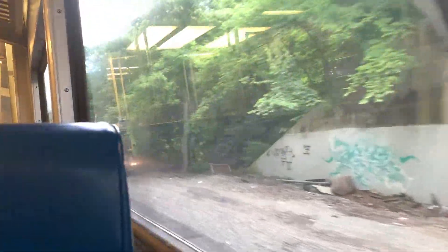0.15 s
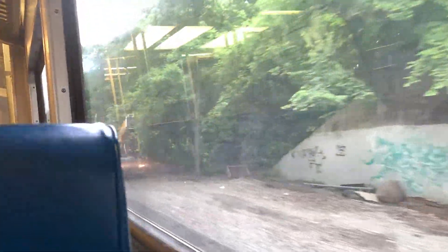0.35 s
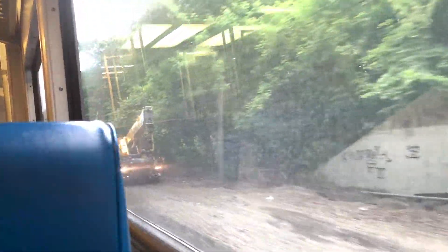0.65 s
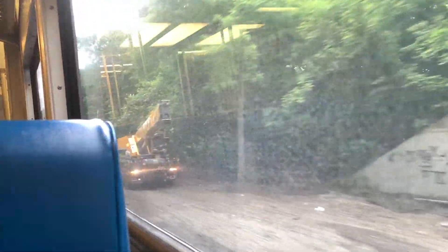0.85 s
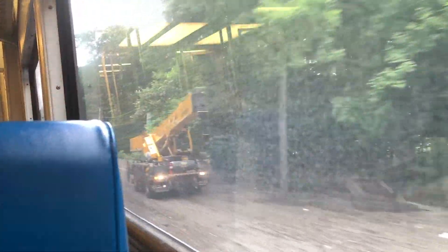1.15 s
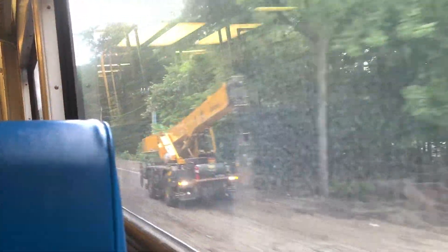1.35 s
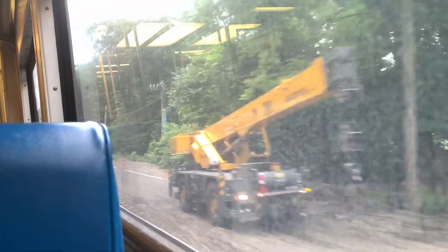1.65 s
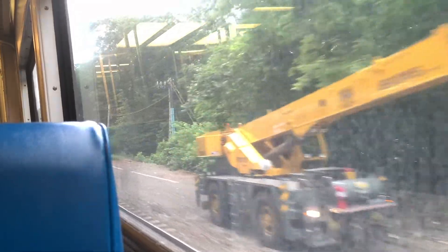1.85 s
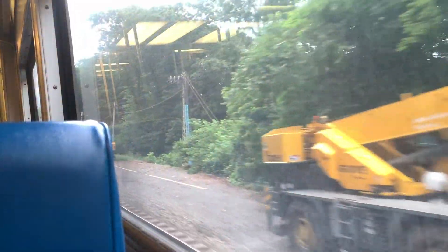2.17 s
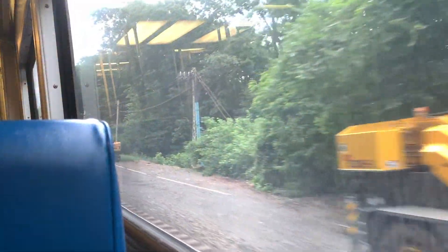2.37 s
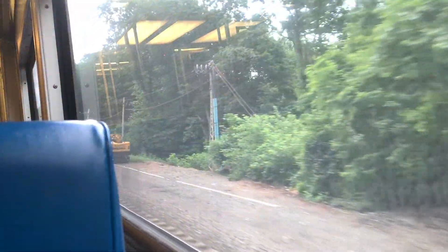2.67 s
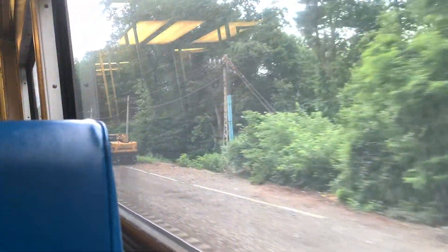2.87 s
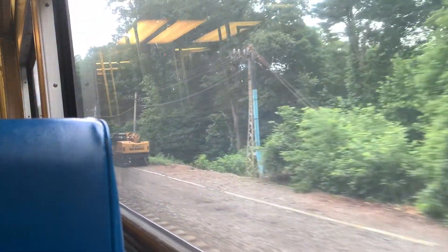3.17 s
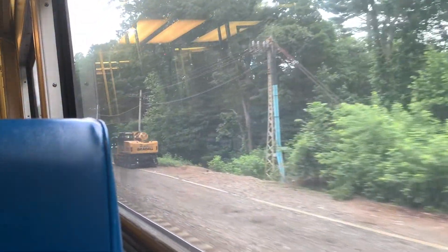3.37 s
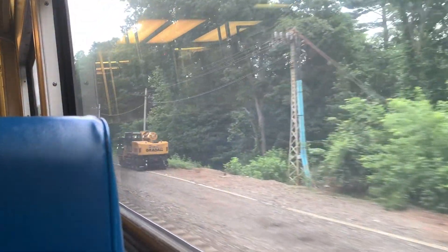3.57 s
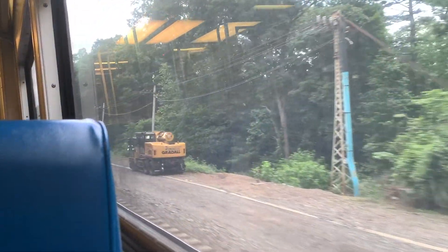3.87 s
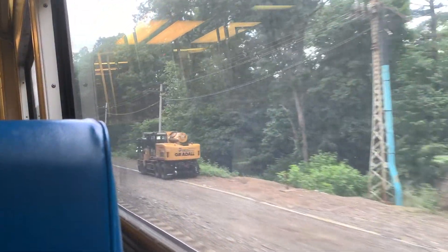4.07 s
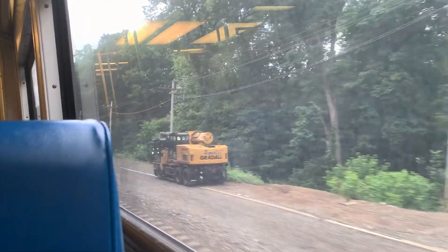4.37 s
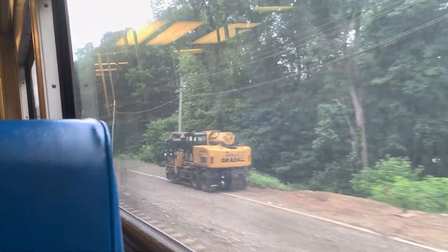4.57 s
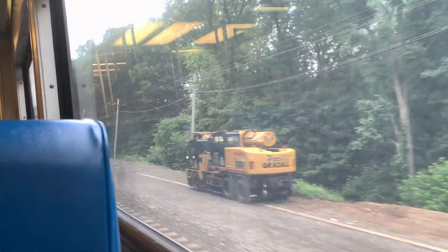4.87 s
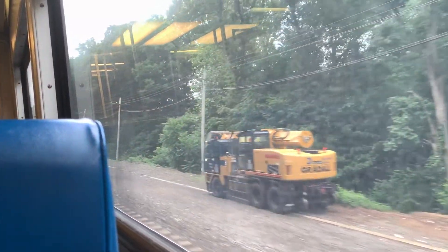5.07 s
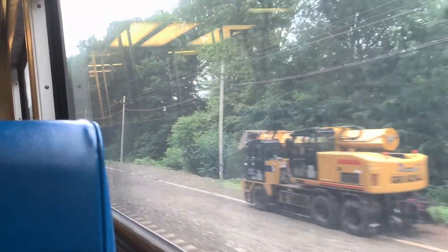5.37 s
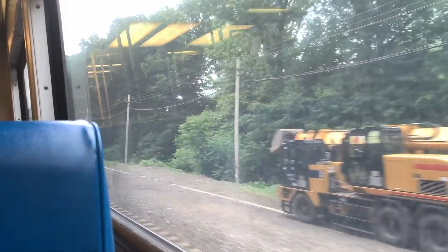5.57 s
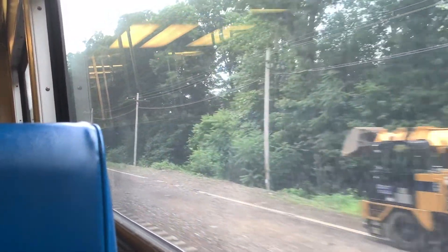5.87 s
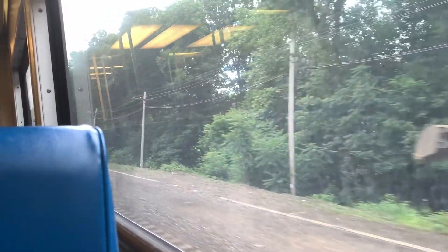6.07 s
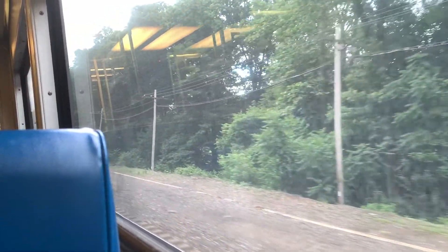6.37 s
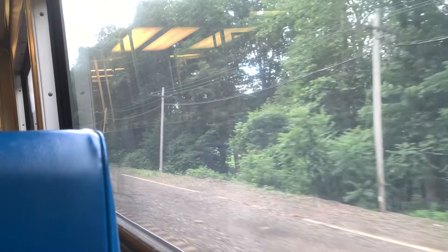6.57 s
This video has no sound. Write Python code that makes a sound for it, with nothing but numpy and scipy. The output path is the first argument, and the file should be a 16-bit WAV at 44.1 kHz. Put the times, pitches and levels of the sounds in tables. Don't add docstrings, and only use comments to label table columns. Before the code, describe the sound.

Inside a moving electric train car, a low, bumpy rumble and muffled roar run throughout. Two close fan hums beat slowly beneath soft duct air and a faint high electrical whine. Small dry clicks and faint creaks occur irregularly; after the middle, a loose panel buzzes with quick light knocks. Close stereo microphones sit in the cabin. Vehicles passing outside make no distinct sound.

```python
import sys
import numpy as np
from scipy import signal
from scipy.fft import rfft, irfft, next_fast_len
from scipy.io import wavfile
from scipy.ndimage import uniform_filter1d

SR = 44100
rng = np.random.default_rng(int(sys.argv[2]) if len(sys.argv) > 2 else 0)


def inscribe(sig):
    pcm = np.round(np.clip(np.atleast_2d(sig).T, -1, 1) * 32767)
    wavfile.write(sys.argv[1], SR, pcm.astype(np.int16))


def nominal_scale(level):
    x = np.asarray(level, float) / 20
    return 10 ** x


N = 296793

SIDE = np.array([[.5], [-.5]])
PANEL_SHAFT_HZ = 34.78

# t/s, f/Hz, rms level/dB
NEAR_FAN = [(0.0, 117.78, -33.5), (0.48, 117.81, -35), (0.96, 118.0, -34.2), (1.44, 118.08, -31.7),
            (1.92, 118.12, -31.5), (2.4, 118.05, -30.5), (2.88, 118.18, -31.5), (3.36, 118.4, -31.6),
            (3.84, 118.44, -32.3), (4.32, 118.6, -34.1), (4.8, 118.76, -32.9), (5.28, 118.55, -30.0),
            (5.76, 118.35, -31.2), (6.24, 118.35, -30.4), (6.73, 118.34, -33.4)]
# t/s, level/dB
AIR = [(0, 0), (.25, 0.5), (.75, 0), (1.25, -1), (2.1, -1), (2.7, -1), (3.6, 0), (4.2, -1), (4.9, 0.5),
       (5.3, -.5), (6.1, 0), (6.73, -0.5)]


def evened(x):
    return x / np.sqrt(np.mean(abs(x) ** 2) + 1e-20)


def read(points, hz, col=1):
    table = np.transpose(points)
    return np.interp(np.log(hz + 1), np.log(table[0] + 1), table[col])


def curve(rows, col):
    table = np.transpose(rows)
    return np.interp(np.arange(N) / SR, table[0], table[col])


def bells(rows, half_s):
    s, value = np.transpose(rows)
    distance = (np.arange(N) / SR - s[:, None]) / half_s
    return np.exp(-.5 * distance ** 2), value[:, None]


def add(mix, s, sound):
    part = mix[:, round(s * SR):][:, :sound.shape[1]]
    part += sound[:, :part.shape[1]]


def slow(per_s):
    t = np.arange(0, N + 64, 64) / SR
    waves = [np.sin(2 * np.pi * (f * t + rng.random())) for f in per_s * np.geomspace(.1, 1, num=16)]
    return np.repeat(evened(sum(waves)), 64)[:N]


def noise(shape, peaks, patchy_db, size):
    # f/Hz, coherence 0-1, phase lead of the left/rad
    stereo_likeness = [(45, .995, 0), (67, .97, -.05), (80, .96, -.21), (108, .95, -.25), (128, .95, -.05),
                          (200, .94, 0), (330, .7, .6), (480, .45, .9), (950, .2, 1.5), (1750, .4, 3.2),
                          (2000, .35, 6.3), (2400, .05, 6.3), (4200, .15, 6.3), (5400, .25, 9.4),
                          (8700, .4, 9.4), (10100, .7, 6.3), (11300, .6, 3.3), (12200, .9, 3.1), (12900, .9, 0),
                       (14400, .9, 0), (15000, .9, -3.1)]
    # f/Hz, level/dB
    port_lean = [(60, -0.5), (99, -1.5), (160, -2), (270, -2.5), (450, -0.5), (740, -0.5), (1220, 0),
                 (2010, 0.0), (3330, 2), (5500, 0.5), (9080, -4.5), (15000, 6.5)]
    ports = stereo_likeness
    hop, hz = size // 4, np.fft.rfftfreq(size, 1 / SR)
    a, b, c, d, patches = rng.standard_normal((N // hop + 6, len(hz), 5)).T
    patches = uniform_filter1d(patches, size=size // 100, axis=0)
    patches = evened(uniform_filter1d(patches, size=3, axis=1))
    boost = 1 + sum(nominal_scale(db) ** 2 / (1 + (2 * (hz - f) / w) ** 4) for f, w, db in peaks)
    gain = nominal_scale(read(shape, hz)) * np.sqrt(boost)
    same = np.clip(read(ports, hz), 0, 1)[:, None]
    delay = np.exp(-1j * read(ports, hz, col=2))[:, None]
    left = a + 1j * b
    right = same * left * delay + np.sqrt(1 - same ** 2) * (c + 1j * d)
    lean = nominal_scale(read(port_lean, hz) / 2)[:, None]
    z = np.array([left * lean, right / lean]) * gain[:, None] * nominal_scale(patchy_db * patches)
    return evened(signal.istft(z, nperseg=size, noverlap=size - hop)[1][:, :N])


def steadied(x, share):
    power = uniform_filter1d((x ** 2).mean(0), size=3500)
    return evened(x / (power + 0.058 * power.mean()) ** (share / 2))


def tone(turns, db, lean_db, lead):
    return np.sqrt(2) * nominal_scale(db + lean_db * SIDE) * np.cos(2 * np.pi * turns + lead * SIDE)


def rumble():
    # f/Hz, level/dB per Hz
    rumble_spectrum = [(15, -38), (24, -32), (30, -0.5), (38, -20), (43, -13.5), (49, -3.5), (57, -1),
                       (70, -5), (90, -2.5), (104, -6.5), (110, -12), (130, -30), (200, -86)]
    # f/Hz, width/Hz, level over the rumble/dB
    floor_modes = [(42.3, 2, 2), (75.2, 1.6, -3.5), (87, 4.9, -15)]
    # t/s at the crest, rms level of the floor/dB
    bumps = [(.13, -23.5), (.32, -28.5), (.62, -27.5), (.78, -30), (1.03, -28.5), (1.22, -24), (1.47, -29),
             (1.68, -26), (1.85, -31.5), (2.0, -29), (2.2, -26.5), (2.38, -25.5), (2.75, -28), (2.95, -30),
             (3.2, -30), (3.4, -29.5), (3.62, -26.5), (3.85, -24), (4.05, -26.5), (4.27, -26),
             (4.52, -29.5), (4.78, -28.5), (5.1, -25.5), (5.3, -29.5), (5.55, -29), (5.77, -27.5),
             (5.92, -29), (6.12, -32.5), (6.48, -24), (6.67, -28)]
    bell, db = bells(bumps, half_s=0.042)
    smooth_rail_db = -31
    surge = np.sqrt(nominal_scale(smooth_rail_db) ** 2 + (nominal_scale(db) ** 2 * bell).sum(0))
    return surge * steadied(noise(rumble_spectrum, floor_modes, patchy_db=.4, size=16384), share=.92)


def roar():
    # f/Hz, level/dB per Hz
    roar_spectrum = [(70, -48), (104, 5.5), (110, -14), (124, -15.5), (130, -5.5), (140, 3), (160, -4.5),
                     (170, -5), (210, -8), (236, -12.5), (270, -8.5), (355, -9), (400, -13.5), (500, -16.5),
                     (600, -17.5), (950, -18.5), (1300, -51)]
    # t/s at the middle, underframe level/dB, walls level/dB
    swells = [(.05, 5.5, -0.5), (.44, 2.5, 2), (.63, 0, 3.5), (.93, 1.5, -0.5), (1.1, -1.5, 0),
              (1.27, 3, -1.5), (1.7, 6.5, 1), (1.9, 1, 1), (2.15, -2.5, -1.5), (2.38, -5, -1),
              (2.65, 0.5, 3.5), (2.8, -1, 1), (3.05, 4.5, -1), (3.17, -9, 0), (3.4, 1, 3.5), (3.66, 3.5, 3),
              (3.98, -3.5, 0), (4.2, 1.5, -0.5), (4.5, -1.5, 2), (4.65, 2.5, -1), (4.8, 3.5, 1),
              (5.0, 6.5, 1), (5.2, -0.5, 1.5), (5.55, -7, 1), (5.85, 2.5, -0.5), (6.1, 4.5, 2),
              (6.27, 3.5, 2.5), (6.45, 5.5, 1), (6.55, 2, 2.5)]
    level_db, underframe_hz, walls_hz = -31.5, 225, 490
    whole = noise(roar_spectrum, [], patchy_db=2.0, size=4096)
    low, under = [signal.sosfiltfilt(signal.butter(4, hz, fs=SR, output="sos"), whole)
                  for hz in (underframe_hz, walls_hz)]
    top = whole - under
    out = nominal_scale(level_db + 0.2) * top.std() * steadied(top, share=0.27)
    for col, part in enumerate([low, under - low]):
        bell, db = bells([(row[0], row[col + 1]) for row in swells], half_s=0.048)
        out = out + nominal_scale(level_db - 0.5 + (db * bell).sum(0)) * part.std() * steadied(part, share=0.92)
    return out


def fans():
    # t/s, f/Hz, rms level/dB
    far_fan = [(0.0, 115.3, -31), (0.48, 115.42, -31.1), (0.96, 115.27, -32.4), (1.44, 114.67, -32.5),
               (1.92, 114.61, -31.5), (2.4, 114.63, -30.8), (2.88, 114.83, -30.0), (3.36, 114.7, -36),
               (3.84, 114.31, -33.5), (4.32, 114.31, -36.5), (4.8, 114.73, -36), (5.28, 114.96, -36),
               (5.76, 114.94, -41), (6.24, 114.83, -41), (6.73, 114.8, -39)]
    # t/s, rms level/dB
    floor_hum = [(0, -37), (.33, -31), (.5, -36), (.7, -33), (.95, -41), (1.4, -39), (2.1, -39), (2.4, -30),
                 (2.6, -40), (3.2, -41), (3.6, -42), (4.1, -47), (5.0, -45), (5.9, -39), (6.73, -41)]
    # t/s, rms level/dB
    overtones = [(0, -38), (.35, -39), (.6, -39), (1.9, -42.5), (2.2, -42), (3.0, -42), (3.3, -50),
                 (4.5, -39), (5.0, -46), (5.25, -61), (5.6, -44), (6.2, -42), (6.73, -37.5)]
    # t/s, rms level/dB
    octave = [(0, -44), (.15, -36.5), (.5, -40.5), (1.2, -40), (1.95, -40), (2.1, -36.5), (2.4, -37.5),
              (2.75, -43), (3.0, -38.5), (3.3, -45), (3.65, -40.5), (4.2, -44), (4.6, -42), (5.05, -47),
              (5.25, -38), (5.5, -44), (6.1, -39.5), (6.73, -46)]
    far = np.cumsum(curve(far_fan, col=1)) / SR
    near = np.cumsum(curve(NEAR_FAN, col=1)) / SR
    out = tone(far - .49, curve(far_fan, col=2) + 1.3, -1.8, -.45)
    out += tone(near, curve(NEAR_FAN, col=2) + 0.23, 1.6, 0.092)
    out += tone(near / 2, curve(floor_hum, col=1), -1.1, .02)
    out += tone(1.505 * near, curve(overtones, col=1) + 1.7 * slow(2.5), .1, 0.15)
    out += tone(2 * near, curve(octave, col=1) + 0.8 * slow(8), -4.5, 0.32)
    return out


def shafts():
    # t/s, then level/dB of quarter blade tone, panel shaft, slower motor, gear shaft
    thumps = [(0, -47, -60, -42, -44), (.9, -48, -58, -44, -49), (1.4, -43, -45, -46, -42),
              (1.9, -45, -42, -38, -41), (2.7, -41, -41, -37, -43), (3.3, -41, -37, -36, -44),
              (4.5, -42, -35, -35, -41), (5.0, -45, -36, -34, -44), (5.5, -47, -35, -37, -53),
              (5.9, -53, -34, -41, -50), (6.73, -53, -35, -36, -47)]
    gears = [(7, -55, -2, .2), (8, -55.5, -3, -.7), (10, -52.5, -3, -2.9)]
    gear_shaft_hz, slower_motor_hz = 138.55, 56.85
    t = np.arange(N) / SR
    near = np.cumsum(curve(NEAR_FAN, col=1)) / SR
    shaft = np.cumsum(gear_shaft_hz * (1 + 0.0022 * slow(8))) / SR
    out = np.zeros((2, N))
    for col, turns in enumerate([near / 4, PANEL_SHAFT_HZ * t, slower_motor_hz * t, shaft]):
        out += tone(turns, curve(thumps, col=col + 1) - 1, -1, 0)
    for k, db, lean_db, lead in gears:
        out += tone(k * shaft + rng.random(), db + 2.95 * slow(12), lean_db, lead)
    return out


def panels():
    # f/Hz, width/Hz, rms level/dB, left minus right/dB, phase lead of the left/rad
    resonances = [(274, 10, -49, -3, 0.3), (336, 10, -48, -2, 0.7), (416, 5, -56, -1, 1.0),
                  (455, 12, -50, -1, 0.5), (481, 7, -53, 3, 0.9), (552, 12, -55, -2, 0.6),
                  (645, 13, -55, 3, 0.1), (672, 7, -59, -2, 0.5), (846, 12, -56, 0, 2.9),
                  (899, 6, -61, 1, -3.0), (1003, 5, -60, -1, 1.4), (1035, 10, -58, 1, 2.4),
                  (1075, 8, -59, 1, -2.4), (1211, 6, -60, 2, 2.9), (878, 8, -59, 0, 3.0),
                  (1287, 8, -60, 1, -2.5), (1448, 14, -61, 1, -1.7), (1351, 8, -58, 0, -1.9),
                  (1506, 10, -60, 2, -1.6), (1568, 6, -65, 2, -2.1), (1682, 12, -58, 0, 3.0),
                  (1731, 14, -63, 1, -2.5), (1923, 15, -65, 1, -0.7), (2013, 5, -66, -1, -0.2),
                  (2546, 9, -70, 0, -0.7)]
    size = next_fast_len(N)
    hz = np.fft.rfftfreq(size, 1 / SR)
    shake = rng.standard_normal(len(hz)) + 1j * rng.standard_normal(len(hz))
    z = 0
    for f, width, db, lean_db, lead in resonances:
        ring = shake / (1 + (2 * (hz - f) / (1.67 * width)) ** 2)
        z = z + nominal_scale(db - 0.45 + lean_db * SIDE) * np.exp(1j * lead * SIDE) * evened(ring)
    return irfft(z, size)[:, :N] * np.sqrt(size)


def rattle():
    # t/s, level/dB
    looseness = [(0, -62), (.5, -65), (1, -56), (2.8, -64), (3.3, -60), (3.7, -49), (5.1, -41.5),
                 (6.73, -41)]
    # t/s, peak level/dB
    hard_knocks = [(3.2533, -52), (3.3176, -54), (3.397, -41), (3.9696, -46), (3.999, -47), (4.232, -42.5),
                   (4.5762, -47), (4.665, -45), (4.6064, -47), (4.6354, -48), (4.7775, -47), (4.806, -43),
                   (4.95, -49), (5.351, -48), (5.5807, -47), (5.6391, -49), (5.669, -54), (6.0142, -50),
                   (3.7708, -47), (2.4384, -56), (4.978, -42), (5.036, -42.5), (5.148, -49), (5.177, -48),
                   (5.2075, -45), (5.3804, -44.5), (5.4104, -43.5), (5.727, -45), (6.0726, -44),
                   (6.3603, -45), (6.5305, -45)]
    # f/Hz, level/dB, decay t60/s
    panel_modes = [(4170, 0, .03), (3750, -2, .025), (4480, -4, .022), (3300, -7, .03)]
    # f/Hz, level/dB per Hz
    snap_spectrum = [(2000, -25), (3500, -4), (5500, 0), (8000, -2), (10500, -7), (13500, -9), (16000, -20)]
    s = np.arange(.0042, N / SR - .01, 1 / PANEL_SHAFT_HZ)
    force, late = rng.standard_normal((len(s), 2)).T
    at = np.round((s + 0.00045 * late) * SR).astype(int)
    blows = np.zeros(N)
    blows[at] = nominal_scale(curve(looseness, col=1)[at] + 3.6 * np.minimum(force, 1.6) - 6.0)
    for when, db in hard_knocks:
        i = round(when * SR)
        blows[i - 300:i + 300] = 0
        blows[i] = nominal_scale(db + 5.0)
    t = np.arange(4000) / SR
    lag = np.array([[0], [.0003]])  # s, the right port is further from the panel
    rings = sum(nominal_scale(db - 60 * t / t60) * np.sin(2 * np.pi * (hz * (t - lag) + rng.random()))
                for hz, db, t60 in panel_modes)
    rings = rings * (1 - np.exp(-t / 0.0024)) * nominal_scale(np.array([[1.5], [-2.5]]))
    snap_decay = nominal_scale(-11 - 60 * t / .035) + nominal_scale(-20 - 60 * t / .15)
    snap = signal.oaconvolve(blows, snap_decay)[:N]
    ringing = signal.oaconvolve(blows[None], rings, axes=1)[:, :N]
    return ringing + snap * noise(snap_spectrum, [], patchy_db=5.0, size=256)


def ticks():
    # t/s, peak level/dB, decay t60/s
    tick_events = [(0.6474, -37.5, 0.27), (.66, -45, .4), (0.848, -39.5, 0.3), (2.1331, -40.5, 0.78),
                   (2.137, -46, 0.15), (2.71, -49, .9), (2.7851, -46, 0.6), (3.3935, -39.5, 0.2),
                   (3.397, -39.5, 0.25), (3.402, -45, 0.3), (3.421, -45, 0.2), (4.2313, -48, 0.35),
                   (5.7249, -49, .3), (.11, -43.5, .9), (.19, -52, 0.74), (1.595, -53, .25),
                   (2.315, -45, .3), (3.01, -50, .25), (4.3505, -36, 0.26), (4.8633, -42, 0.92),
                   (4.875, -47, .6), (4.9, -51, .6), (6.3589, -43, 0.35), (6.7042, -42, 0.31)]
    # f/Hz, level/dB per Hz
    tick_spectrum = [(2000, -25), (3500, -7), (5500, 0), (9000, -3), (12000, -1.5), (13500, -2.5),
                     (14900, -8), (15500, 10)]
    gate = np.zeros((1, N))
    t = np.arange(12000) / SR
    for s, db, t60 in tick_events:
        decay = .5 * nominal_scale(-60 * t / .07) + .5 * nominal_scale(-60 * t / t60)
        burst = (1 - np.exp(-t / .0015)) * decay
        add(gate, s, nominal_scale(db + 3.5) * burst[None])
    return gate * noise(tick_spectrum, [], patchy_db=0.5, size=512)


def creaks():
    # t/s, rms level/dB, f/Hz, width/Hz, length/s
    creak_events = [(.27, -58, 2200, 60, .1), (.28, -53, 1800, 60, .13), (.24, -51.5, 1650, 450, .19),
                    (.27, -54, 1450, 60, .12), (.4, -62, 2800, 50, .1), (.57, -58, 3150, 120, .19),
                    (.57, -55.5, 3500, 250, .19), (.58, -59, 3850, 150, .1), (1.515, -51.5, 2330, 12, .075),
                    (1.588, -51, 2330, 25, .07), (1.59, -55, 2700, 60, .04), (1.548, -52, 4250, 60, .022),
                    (1.572, -56, 3800, 90, .045), (1.572, -55, 4100, 90, .04), (2.56, -50, 2700, 450, .035),
                    (3.386, -54, 2200, 500, .057), (3.88, -39, 328, 6, .18), (3.78, -43, 455, 8, .14),
                    (2.62, -42, 275, 6, .17), (2.22, -43, 345, 12, .13), (6.15, -45, 462, 8, .15),
                    (1.15, -32, 92, 4, .2), (3.75, -32, 74, 4, .2), (5.82, -38, 182, 5, .2),
                    (5.3, -38, 148, 6, .2), (4.55, -39, 185, 8, .18), (1.45, -42, 280, 10, .2),
                    (.65, -32, 65, 10, .2), (5.1, -32, 78, 8, .2)]
    lag_s = .00005
    out = np.zeros((2, N))
    for s, db, hz, width, length in creak_events:
        u = np.arange(round(length * SR)) / SR
        pole = np.exp(-np.pi * width / SR)
        scrape = signal.lfilter([1], [1, -pole], rng.standard_normal((2, 9000)))[:, -len(u):]
        turn = 2 * np.pi * hz * (u + lag_s * SIDE)
        scrape = scrape[0] * np.cos(turn) + scrape[1] * np.sin(turn)
        add(out, s, nominal_scale(db) * evened(scrape) * signal.windows.tukey(len(u), .5))
    return out


def ducts():
    # f/Hz, level/dB per Hz
    duct_spectrum = [(700, -35.5), (1000, -3), (1500, -0.5), (1620, -7), (1750, -5.5), (2100, -10),
                     (2300, -13.5), (2600, -23), (3200, -39)]
    level = nominal_scale(-41.5 + curve(AIR, col=1))
    return level * steadied(noise(duct_spectrum, [], patchy_db=2.0, size=2048), share=0.41)


def fizz():
    # f/Hz, level/dB per Hz
    fizz_spectrum = [(2000, -2.5), (2500, 5), (3200, 1), (4300, 2), (4800, -4.5), (6500, -5), (7800, -11),
                     (9500, -24.5),
                     (10400, -20), (11200, -24), (11600, -31), (12600, -39), (13300, -36), (14200, -46),
                 (16000, -43)]
    # order, level over the fizz/dB
    whine_orders = [(14, 8.5), (15, 8.5), (16, 9.5), (17, 6), (18, 7.5), (19, 2), (20, 5), (21, 5.5),
                    (22, -1), (23, 8), (24, 14.5), (25, 15), (26, 15), (27, 14.5), (29, -1), (31, -6),
                    (37, 3), (38, 8), (39, 14), (40, 11), (41, 10), (42, 6)]
    whine_hz = 335.4
    whine = [(k * whine_hz, min(2.2 * k, 55), db) for k, db in whine_orders]
    level = nominal_scale(-48.5 + curve(AIR, col=1) + 0.53 * slow(8))
    return level * noise(fizz_spectrum, whine, patchy_db=1.66, size=2048)


def scene():
    moving = rumble() + roar() + fans() + shafts() + panels()
    return moving + rattle() + ticks() + creaks() + ducts() + fizz()


def low_pass(x):
    return signal.sosfilt(signal.butter(12, 15610, fs=SR, output="sos"), x)


def record(dry):
    # f/Hz, level/dB
    microphone = [(0, -20), (20, -11), (31, -1), (36, 0), (9800, 0), (11000, -3.5), (12500, -6),
                  (13400, -6), (14300, -13), (SR / 2, -14)]
    fade_s, ceiling = .002, .55
    size = next_fast_len(N + 4096)
    faded = dry * signal.windows.tukey(N, 2 * fade_s * SR / N)
    response = nominal_scale(read(microphone, np.fft.rfftfreq(size, 1 / SR)))
    heard = irfft(rfft(faded, size) * response, size)[:, :N]
    return low_pass(ceiling * np.tanh(heard / ceiling))


dry = scene()
out = record(dry)
inscribe(out)
```